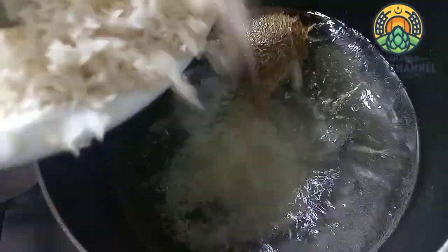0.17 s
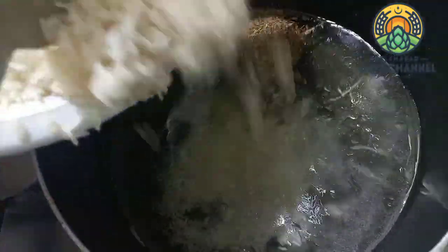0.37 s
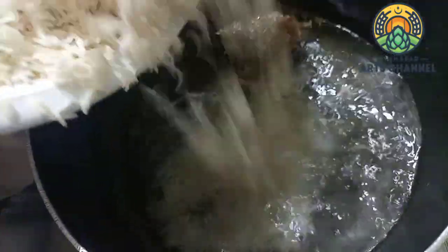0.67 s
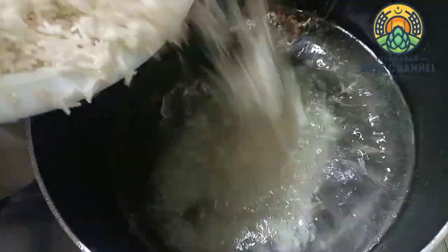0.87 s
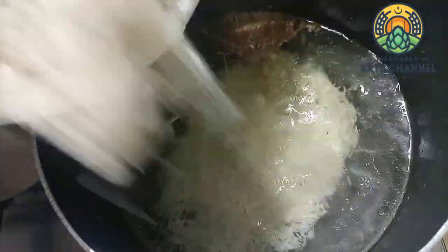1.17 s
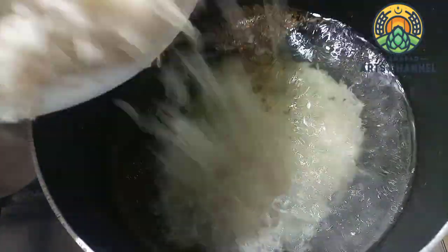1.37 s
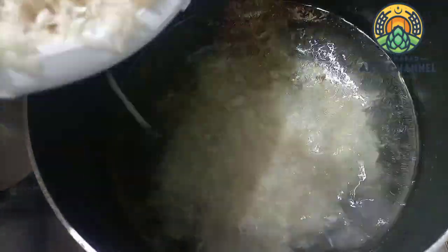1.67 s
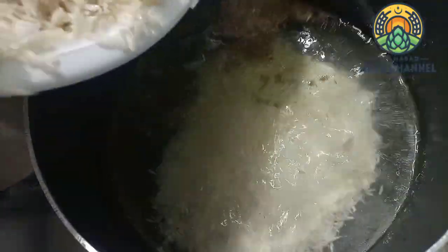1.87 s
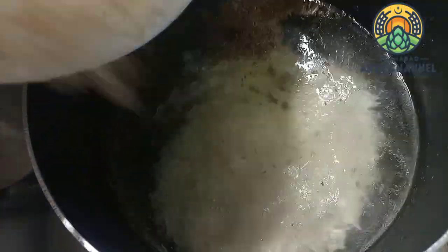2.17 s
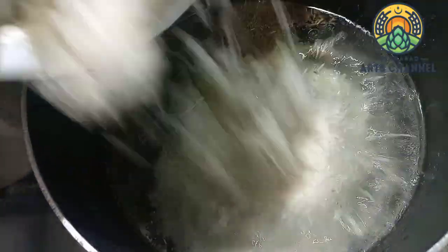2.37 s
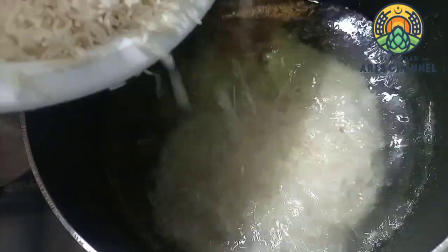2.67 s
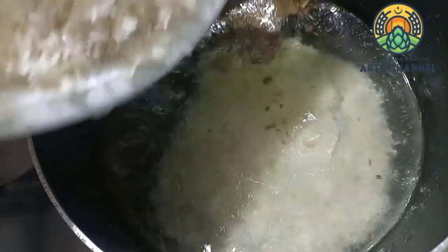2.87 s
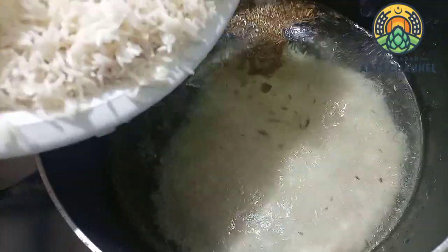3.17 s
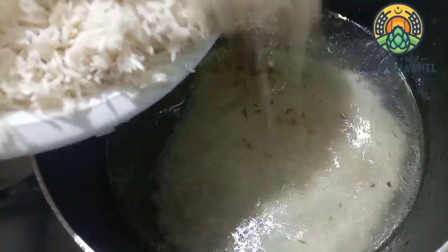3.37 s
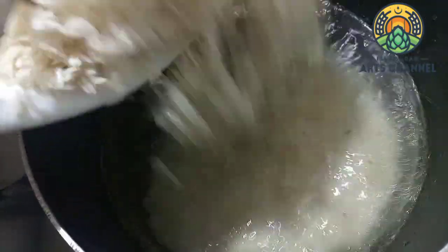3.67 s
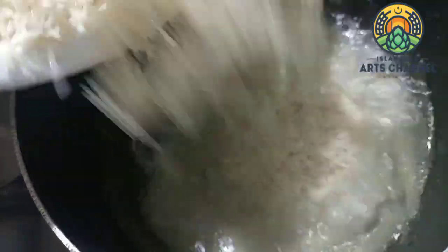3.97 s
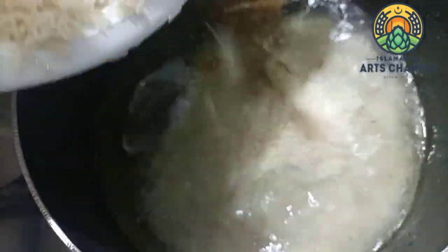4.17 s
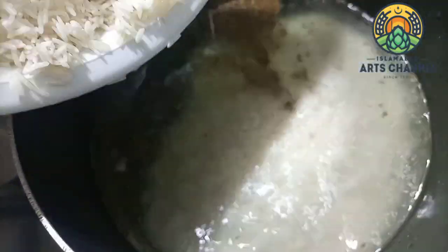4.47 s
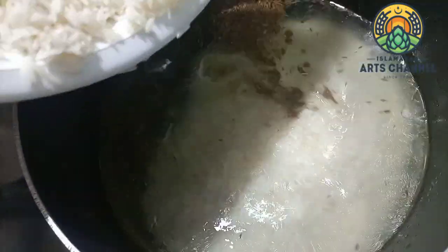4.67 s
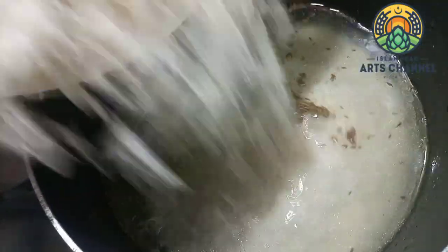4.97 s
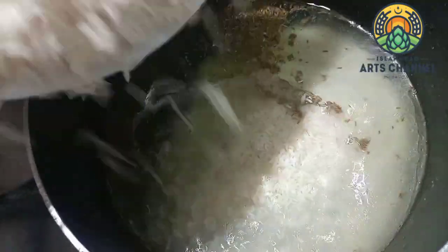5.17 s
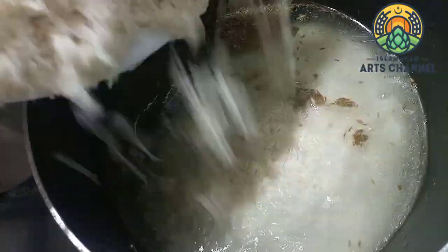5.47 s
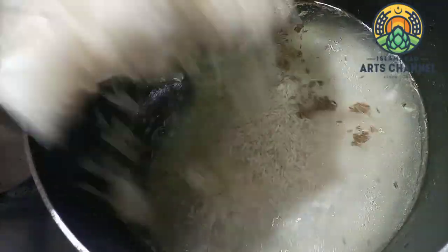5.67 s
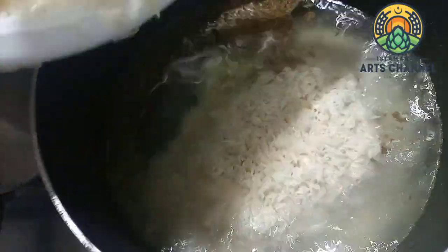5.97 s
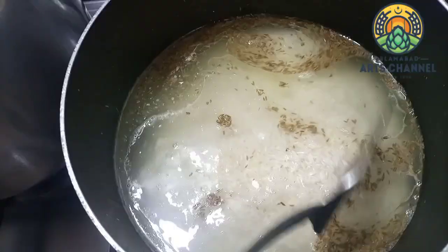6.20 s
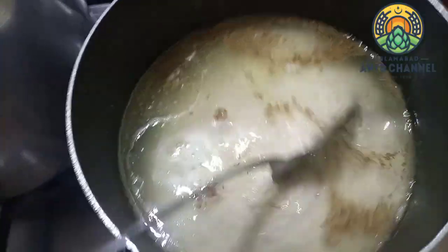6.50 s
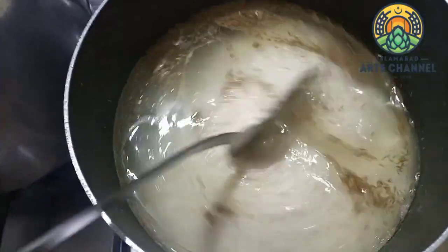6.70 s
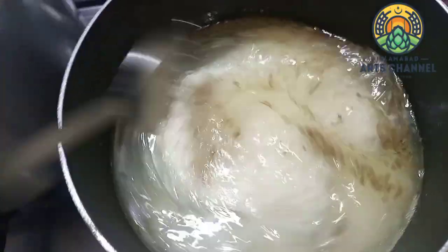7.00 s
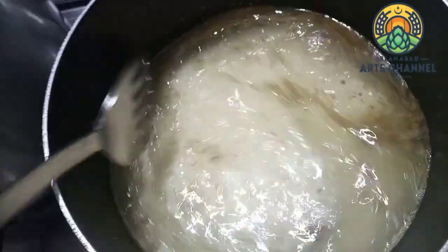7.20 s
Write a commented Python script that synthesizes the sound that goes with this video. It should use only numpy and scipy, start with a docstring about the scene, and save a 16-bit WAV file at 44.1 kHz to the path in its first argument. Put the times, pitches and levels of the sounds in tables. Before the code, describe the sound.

Wet rice is shaken from a bowl into a pot of water in pattering, bubbling bursts, bowl knocks between, then a spoon stirs and clinks.

```python
"""Soaked rice is shaken from a bowl into a pot of water in short pours that swell, hold and trail off,
close to a phone microphone in a small kitchen. Random impacts tick on the surface and tiny chirping
bubbles ring the air in the pot; the bowl, as damped modes and noise, is knocked between pours.
Then the water hisses softly as filtered impacts while a metal spoon scrapes through the rice and
clinks against the wall, as short ringing modes."""
import sys
import numpy as np
from scipy import signal
from scipy.fft import rfft, irfft, next_fast_len
from scipy.io import wavfile
from scipy.ndimage import uniform_filter1d

SR = 44100
rng = np.random.default_rng(int(sys.argv[2]) if len(sys.argv) > 2 else 0)


def wav_record(signal):
    """Record a signal, one row per channel, as 16-bit PCM in the file named by sys.argv[1]."""
    frames = np.transpose(np.atleast_2d(signal))
    bounded = np.clip(frames, -1, 1)
    # unit amplitude maps onto the largest positive 16-bit level
    quanta = np.round(bounded * 32767).astype(np.int16)
    wavfile.write(sys.argv[1], SR, quanta)


N = 323694
T = np.arange(N) / SR

# Event levels are set at the source, before any echo of pot and kitchen.
# pours of rice: [t/s, swell/s, hold/s, t60/s, patter level/dB, bubbles re patter/dB, tilt/(dB/octave)]
POURS = [(0.447, 0.013, 0.044, 0.11, -53, -30, 0), (0.554, 0.024, 0.15, .12, -54, -11.5, 0),
         (0.801, 0.0089, 0.29, 0.3, -57, 2, 1), (1.222, 0.038, 0.055, 0.76, -61.5, 4.5, 3),
         (1.48, 0.021, 0.11, 0.1, -58, -1, 7.5), (2.244, 0.037, 0.11, 0.15, -41, -3, 0),
         (2.466, 0.064, 0.046, 0.2, -39, -5, -2), (3.368, 0.062, 0.026, 0.32, -44, -19, -3.5),
         (3.528, 0.045, 0.065, 0.18, -51.5, -12, 2), (3.68, 0.022, 0.21, 0.085, -53.5, 0, 4),
         (3.965, 0.026, 0.067, 0.13, -47, -6.5, 1), (4.95, 0.019, 0.024, 0.29, -50, -5, 5.5),
         (5.347, 0.0077, 0.023, 0.37, -54.5, -6.5, 9), (5.617, 0.0044, 0.058, 0.15, -64, -7, 5),
         (5.723, 0.006, 0.1, 0.12, -50.5, -9.5, 0.5), (5.837, 0.0054, 0.025, 0.1, -37.5, -12.5, -5.5)]
# wet clumps that hit the water: [t/s, level/dB, tilt/(dB/octave)]
CLUMPS = [(0.07, -40, -3), (0.167, -46, 1), (0.256, -47.5, 1), (0.318, -53.5, 8.5), (0.366, -49.5, 6.5),
          (0.462, -38.5, -4), (.509, -50, 4), (0.686, -40.5, -12), (0.742, -42.5, 1), (0.769, -42, -9),
          (0.864, -43, 5.5), (.929, -48.5, 14), (1.038, -40, -7), (1.26, -40.5, 3), (1.29, -48, -3),
          (1.373, -52, -2), (1.4975, -35, 4.5), (1.504, -38, 5), (1.568, -38, -3.5), (2.24, -38, 5),
          (2.329, -34, 2.5), (2.36, -41, 20), (2.471, -39.5, -2), (2.55, -34.5, -1), (2.584, -39, 11),
          (3.247, -58, -2), (3.372, -37.5, 4.5), (3.42, -35.5, 5), (3.4615, -33.5, 7), (3.758, -41.5, 5.5),
          (3.8038, -40, 4), (3.859, -34, 2), (3.989, -31, 4), (4.038, -38.5, 3), (4.103, -39.5, -5),
          (5.132, -44.5, 2), (5.25, -55, 9), (5.374, -40, -6), (5.461, -50, 4)]
# single large bubbles: [t/s, peak level/dB, f/Hz at the start]
BUBBLES = [(0.033, -46.5, 2270), (0.073, -34, 2474), (0.16, -43.5, 2340), (0.249, -45, 1820),
           (0.483, -49, 1816), (.507, -44, 3620), (.598, -41.5, 1817), (0.647, -44.5, 1780),
           (.685, -39, 2460), (0.71, -33.5, 2505), (0.77, -39, 2240), (0.815, -33.5, 2470),
           (0.841, -37, 1910), (.873, -41, 1860), (0.951, -37, 2310), (.986, -39, 2580), (1.028, -41, 3000),
           (1.054, -41, 3830), (1.097, -26, 1895), (1.321, -45, 2600), (1.37, -42, 1823),
           (1.445, -43.5, 1790), (1.508, -42.5, 1860), (2.257, -30, 4880), (2.263, -37, 2950),
           (2.274, -29, 1830), (2.305, -35, 3470), (2.331, -31.5, 2220), (2.346, -32, 1810),
           (2.361, -24, 1846), (2.389, -38, 3700), (2.403, -37, 1880), (2.418, -35.5, 3710),
           (2.466, -35.5, 1760), (2.473, -40.5, 3660), (2.499, -37, 3330), (2.553, -24, 1805),
           (2.584, -33, 3660), (3.252, -49, 2004), (3.381, -38, 1910), (3.404, -31.5, 3260),
           (3.426, -27.5, 2435), (3.469, -30.5, 2440), (3.612, -36, 1830), (3.759, -30, 4640),
           (3.759, -38, 1800), (3.995, -28.5, 1863), (4.019, -39, 3790), (4.099, -44, 2310),
           (4.963, -33.5, 4480), (5.107, -35.5, 2567), (5.244, -36, 2470), (5.371, -40.5, 2620),
           (5.398, -44, 3600), (5.482, -35.5, 2540), (5.834, -37, 1560), (5.91, -30.5, 2264),
           (5.962, -46, 2630)]
# single grains that strike the wall of the pot: [t/s, peak level/dB after the treble cut, centre f/Hz]
STRIKES = [(0.0718, -37.5, 2580), (0.1934, -46.5, 4170), (0.3214, -37, 3660), (.429, -42, 4640),
           (0.531, -36, 3850), (0.5815, -50, 2370), (0.616, -38.5, 2400), (0.7, -36, 3600),
           (0.8167, -28.5, 2700), (0.955, -37, 2430), (0.988, -47, 2580), (1.0308, -41, 3020),
           (1.043, -34, 3340), (1.2388, -46, 1100), (1.272, -31, 2950), (2.2586, -34, 2980),
           (2.333, -27.5, 2400), (2.364, -29, 2980), (2.4611, -34, 5260), (2.5902, -29.5, 3730),
           (3.245, -37, 3640), (3.267, -46, 3600), (3.462, -26, 4240), (3.597, -33, 5230),
           (3.7598, -32, 1960), (3.866, -33, 2660), (4.3597, -46, 4470), (5.603, -49, 2470),
           (5.7155, -41, 2550), (5.8357, -31, 1650), (5.8495, -27, 2330), (5.865, -25, 2600),
           (5.8998, -32.5, 2570)]
# dull bumps and heavy plops: [t/s, peak level/dB, f/Hz, length/s (half the t60)]
THUDS = [(1.236, -47.5, 450, 0.05), (1.536, -56, 242, 0.042), (1.968, -56, 138, 0.053),
         (1.975, -47.5, 473, 0.035), (2.263, -56, 420, 0.049), (3.61, -56.5, 420, 0.04),
         (3.648, -57, 128, 0.024), (3.844, -58.5, 130, 0.087), (4.369, -52.5, 167, 0.079),
         (4.439, -60, 71, 0.078), (4.788, -55.5, 267, 0.05), (5.603, -57.5, 110, .03),
         (5.644, -51, 332, .03), (5.663, -43, 255, 0.0079), (5.719, -56.5, 80, 0.069),
         (5.781, -55, 200, 0.054), (5.842, -33.5, 504, 0.0092), (5.896, -44, 610, 0.011),
         (5.898, -47.5, 169, 0.018), (5.928, -45, 139, 0.041), (6.08, -41, 597, 0.0051),
         (6.093, -38, 394, 0.0068), (6.129, -62, 100, 0.047), (6.36, -62.5, 105, 0.044),
         (7.113, -37.5, 330, .013), (7.135, -43, 395, 0.055), (7.225, -53, 121, 0.09),
         (7.289, -37, 620, 0.064), (7.321, -45.5, 288, 0.035)]
# gurgles of trapped air: [t/s, length/s, peak level/dB, centre f/Hz]
GURGLES = [(1.239, .04, -61, 900), (1.504, 0.0093, -49, 1114), (2.487, .035, -52, 1190),
           (2.538, 0.063, -44, 1300), (3.621, .025, -52.5, 1000), (5.02, .008, -43.5, 1680),
           (5.035, 0.0074, -55, 1030)]
# knocks on the rice bowl: [t/s, peak level/dB, hollow note f/Hz, tuning ratio of the wall modes,
# hollow note level/dB, middle level/dB, treble level/dB, rim note f/Hz, rim note level/dB]
KNOCKS = [(1.777, -23.5, 860, 1.164, -10.5, -4.5, 1.5, 2763, 8),
          (1.963, -14.5, 730, 1.06, -0.5, 0, 8, 2370, 4.5),
          (2.021, -26, 730, 0.92, -25, -0.5, 16.5, 3920, -10.5),
          (2.961, -31.5, 854, 0.82, 22, 2, -1, 2680, 1), (2.967, -15.5, 726, 0.87, 17, 5, 9.5, 2680, 7),
          (3.131, -25, 800, 0.93, 9, 1.5, 4, 3876, 7), (4.334, -14.5, 547, 1.04, 2, -1, -8.5, 2180, 1),
          (4.386, -39, 515, 1.03, 7, 2, -6, 3380, 0), (4.788, -40, 1055, 1.25, 10, -4, -6.5, 3070, 6),
          (5.911, -24, 444, 1.1, -22, -5.5, 9, 3620, -2.5)]
# rice sliding in the bowl: [t/s, hold/s, level/dB]
SLIDES = [(2.117, 0.011, -62.5), (3.223, 0.026, -67), (4.495, 0.042, -57)]
# wet grains squeaking against the bowl: [t/s, peak level/dB, length/s (half the t60), f/Hz]
SQUEAKS = [(2.135, -51, 0.056, 2600), (3.24, -46, 0.018, 4130), (4.4, -53.5, 0.085, 3130),
           (4, -48, .045, 1520), (4.51, -48.5, 0.053, 3400), (4.535, -49, 0.12, 2950),
           (4.515, -61, .04, 5200), (4.545, -54, 0.082, 4670), (4.54, -68, 0.049, 6300)]
# low booms of the nudged pot: [t/s, peak level/dB, f/Hz, t60/s]
BOOMS = [(5.657, -43, 87.5, .09), (5.668, -39.5, 150, 0.026), (5.847, -35, 175, 0.021),
         (5.85, -51, 70, .06), (5.943, -46.5, 62, 0.09), (6.012, -52, 65, .08), (7.149, -39.5, 106.3, 0.2)]
# spoon sliding through the rice: [t/s, peak level/dB, length/s (half the t60), f/Hz]
SCRAPES = [(6.06, -61, 0.065, 5980), (6.08, -47, 0.053, 3190), (6.085, -55, 0.089, 4380),
           (6.115, -68, .05, 6750), (6.135, -62, .04, 5510), (6.19, -57, 0.08, 4100),
           (6.21, -64, .04, 4800), (6.298, -58, 0.042, 6370), (6.299, -52.5, .04, 4110),
           (6.3, -62, 0.026, 5160), (6.345, -58.5, 0.084, 4480), (6.385, -67, 0.08, 5800),
           (6.42, -71, 0.065, 6750), (6.435, -54.5, 0.079, 4370), (6.47, -62.5, .05, 5020)]
# spoon striking the pot: [t/s, peak level/dB, lower note f/Hz, upper note f/Hz, treble level/dB, body level/dB]
CLINKS = [(7.115, -9.5, 2020, 2610, -13.5, -11.5), (7.1524, -13, 2505, 2785, -15.5, -10.5),
          (7.248, -22, 2790, 2970, -6, -9.5), (7.2918, -13, 1840, 2356, -8.5, -6)]

# air resonances above the water: [f/Hz, level/dB, t60/s]
CAVITY = [(1835, -11.5, 0.075), (2466, -12, 0.068), (3054, 0, 0.012), (3730, -10.5, 0.04),
          (4310, -5.5, 0.028), (5400, -11.5, 0.062)]
# hollow notes of the bowl, which shift with grip and load: [ratio to the note, level/dB, t60/s]
BOWL_HOLLOW = [(0.922, -8.5, 0.046), (1.026, 1.5, 0.027), (1.244, -5, 0.03), (1.0, -11, 0.15)]
# modes of the bowl's wall, before tuning: [f/Hz, level/dB, t60/s]
BOWL_WALL = [(1454, 3, 0.047), (1587, -6.5, 0.055), (2070, -5.5, 0.052), (2598, -2.5, 0.029),
             (2848, -6, 0.017), (3760, -9.5, 0.018), (4013, -18.5, 0.012)]
# modes of spoon and pot: [f/Hz, level/dB, t60/s]
POT = [(704, -9, .15), (855, 7.5, .12), (1054, 12.5, 0.18), (1340, -14, .22), (1575, 5.5, 0.23),
       (1820, -4, .17), (2000, 16.5, .19), (2350, -3, .17), (2540, 5, 0.24), (2760, 3, .14),
       (3300, -12, .06), (4170, -11.5, .05), (6350, -12, .035)]

# filter curves of room noise, patter, knock, sliding rice, hiss and clink: [f/Hz, level/dB]
ROOM_COLOUR = [(18, -61.5), (30, -23), (124, -3.5), (227, -9.5), (303, -1), (404, -9), (1390, -9),
               (1540, -7), (1670, -4.5), (3060, -14.5), (3980, -22), (4300, -24.5), (5900, -25.5),
               (6380, -37.5), (16000, -50.5)]
PATTER_COLOUR = [(530, -44), (900, -31), (1080, -44.5), (1600, -25.5), (1730, -31), (1830, -4), (2120, -12),
                 (2420, -4.5), (2730, -14), (3730, -5.5), (4740, -6), (6000, -12), (7310, -22.5),
                 (8700, -28), (10600, -35.5), (13000, -45.5), (16000, -32.5)]
KNOCK_COLOUR = [(150, -36), (450, -1.5), (750, 4), (1150, 5.5), (1600, 9.5), (2700, 0), (4000, -1.5),
                (6000, -22.5), (9000, -51), (15000, -116.5)]
SLIDE_COLOUR = [(400, -22), (730, 2.5), (1250, -10), (1490, 2), (2200, -4), (3100, 6.5), (3900, -3),
                (4500, -7.5), (5100, -6), (5900, -18), (7000, -40), (12000, -50)]
HISS_COLOUR = [(180, -14.5), (300, -6), (328, -19), (402, -10.5), (1030, -7), (1250, -8.5), (1530, 6),
               (1850, 5.5), (2400, 11.5), (2750, 8), (3200, -5.5), (3910, -18), (4270, -16), (6530, -48),
               (10000, -76), (13000, -91.5), (22000, -120)]
CLINK_COLOUR = [(30, -60), (170, -13), (400, -1), (1050, 1), (1320, -12.5), (1750, 1.5), (2700, 10),
                (3700, -1), (4300, 4), (5200, -10), (6300, -4), (8500, -37), (15000, -90)]

# bands of the patter that flare separately from lump to lump
PATTER_BANDS_HZ = np.geomspace(1700, 13600, 10)
MOTTLE_DB = 3.1

ROOM_DB, RUMBLE_HZ, RUMBLE_DB, RUMBLE_WAVER_DB = -66.5, 108, -87, 4.5
TRICKLE_DB, TRICKLE_S = -66, 0.15  # stray grains keep falling around each pour
HEAVY_DB = -38  # flow at which the patter is fully dense
LOW_BUBBLE_DB = -27  # heavy flow also traps larger, lower bubbles
CLUMP_ATTACK_S, CLUMP_T60_S = 0.003, 0.084
# t60 at the reference pitch, how much sooner higher bubbles die (exponent), rise in octaves per t60
BUBBLE_REF_HZ, BUBBLE_T60_S, BUBBLE_DAMPING, BUBBLE_RISE = 2000, 0.018, 0.98, 0.057
# one drop of water chirps steeply upwards; rise in octaves per t60
DRIP_S, DRIP_DB, DRIP_HZ, DRIP_T60_S, DRIP_RISE = 5.2, -30.5, 1450, .031, 1.9
THUD_OCTAVES = 0.89  # scales the width of their band
GURGLE_OCTAVES, GURGLE_T60_S = 0.53, 0.015  # spread of pitch and t60 of their bubbles
THIN_START_S, THIN_SWELL_S, THIN_HZ, THIN_DB = 1.85, .108, 1020, -54.5
SLIDE_SWELL_S, SLIDE_T60_S = 0.036, 0.38
STIR_S, STIR_DB, STIR_FADE_DB_PER_S = 6.02, -55, 2  # the water hisses from the first stroke on
SURGE_S, SURGE_DB, SURGE_T60_S = 6.301, -45.5, 0.95  # and surges when the spoon digs in
CLANK_T60_S = .045
CLANK_DB, POT_DB = -6.5, -17  # peaks of the spoon's two notes and of the pot, re the contact noise
TOP_HZ = 15850


def undb(db):
    """Decibels to gain."""
    return 10 ** (np.asarray(db) / 20)


def unit(x):
    """Scale to rms 1."""
    return x / np.sqrt(np.mean(x ** 2))


def peak(x, db):
    """Scale to a peak level."""
    return x * undb(db) / np.abs(x).max()


def fade(t, t60):
    """Exponential decay by 60 dB in t60 seconds."""
    return np.exp(-np.log(1000) * t / max(t60, 1e-4))


def envelope(start, swell, hold, t60):
    """Linear swell, hold and exponential release."""
    t = T - start
    return np.clip(t / max(swell, 1e-4), 0, 1) * fade(np.maximum(t - swell - hold, 0), t60)


def add(out, s, x):
    """Mix x into out at time s."""
    i = int(np.clip(s * SR, 0, N - 1))
    out[i:i + len(x)] += x[:N - i]


def colour(x, points):
    """Causal, minimum-phase filter through (Hz, dB) points, built from the cepstrum."""
    size = next_fast_len(len(x) // 2 + 2048) * 2
    hz, db = np.transpose(points)
    log_hz = np.log(np.fft.rfftfreq(size, 1 / SR) + 1)
    gain = undb(np.interp(log_hz, np.log(hz), db))
    cepstrum = irfft(np.log(gain))
    # folding the cepstrum forward in time makes the filter causal
    cepstrum[1:size // 2] *= 2
    cepstrum[size // 2 + 1:] = 0
    return irfft(rfft(x, size) * np.exp(rfft(cepstrum)))[:len(x)]


def ring(modes):
    """Impulse response of (Hz, dB, t60) modes: a sum of decaying sines."""
    t = T[:SR // 4]
    return sum(undb(db) * fade(t, t60) * np.sin(2 * np.pi * hz * t) for hz, db, t60 in modes)


def bubble(hz, t60, rise, swell=0.13, bend=0.74):
    """A trapped bubble rings, rising in pitch as it nears the surface."""
    t = T[:int(t60 * SR) + 2]
    pitch = hz * 2 ** np.minimum(rise * (t / t60) ** bend, 2)
    onset = (1 - np.exp(-t / (swell * t60))) ** 2
    return fade(t, t60) * onset * np.sin(2 * np.pi * np.cumsum(pitch) / SR)


def ticks(per_s, scatter_db):
    """Random impacts of either sign and uneven size."""
    hit = rng.random(N) < per_s / SR
    size = undb(scatter_db * np.minimum(rng.exponential(size=N), 4))
    return hit * rng.choice([-1, 1], N) * size


def fizz(low_hz, high_hz, cycles, scatter_db, count):
    """A stream of bubbles of all sizes, each ringing for about the given number of cycles."""
    out = np.zeros(N)
    for when, size, loud, life in rng.random((count, 4)):
        hz = low_hz * (high_hz / low_hz) ** size
        gain = undb(-scatter_db * np.log(loud + .02))
        add(out, when * T[-1], gain * bubble(hz, cycles * (.5 + life) / hz, .08))
    return out


def lumpy(rate, depth_db, t=T):
    """Uneven level, drifting between random knots, as when wet grains stick together in quick lumps."""
    knots = np.cumsum(rng.exponential(1 / rate, 4000))
    heights = np.clip(rng.standard_normal(4000), -2, 2)
    return unit(undb(depth_db * np.interp(t, knots, heights)))


def steady(x, span_s):
    """Even out a random stream over a span, leaving its fine grain."""
    local_power = np.abs(uniform_filter1d(x ** 2, int(span_s * SR)))
    return x / np.sqrt(local_power + 0.056 * np.mean(x ** 2))


def mottle(x, tilt):
    """Lumps of grains land with their own colour: bands flare separately, around a tilt in dB per octave."""
    size = next_fast_len(N)
    spectrum, out = rfft(x, size), 0
    log_hz = np.log(np.fft.rfftfreq(size, 1 / SR) + 1)
    for hz, own in zip(PATTER_BANDS_HZ, np.eye(len(PATTER_BANDS_HZ))):
        band = irfft(spectrum * np.interp(log_hz, np.log(PATTER_BANDS_HZ), own), size)[:N]
        octaves = min(np.log2(hz / 3500), 1.5)
        out = out + band * lumpy(rate=190, depth_db=MOTTLE_DB) * undb(tilt * octaves)
    return out


def in_pot(x, ring_db, dense_db):
    """Sound from the surface, the main air resonances of the pot and its many weaker ones."""
    weak = [(1600 + 70 * (k + place), 8 * loud, .035)
            for k, (place, loud) in enumerate(rng.random((95, 2)))]
    signs = rng.choice([-1, 1], len(weak))
    walls = sum(sign * ring([mode]) for sign, mode in zip(signs, weak))
    rung = unit(signal.fftconvolve(x, ring(CAVITY))[:N])
    dense = unit(signal.fftconvolve(x, walls)[:N])
    return unit(unit(x) + undb(ring_db) * rung + undb(dense_db) * dense)


def crack(t60, tail_db, tail_t60):
    """Contact noise with a weaker, longer rattling tail."""
    t = T[:SR // 4]
    return rng.standard_normal(len(t)) * (fade(t, t60) + undb(tail_db) * fade(t, tail_t60))


def damped(x, left):
    """The ring holds for a moment, then drops to a share of its strength."""
    return x * np.interp(T[:len(x)], [.011, .016], [1, left])


def rubs(table, ring_t60, rasp_db):
    """Uneven friction swells and dies; each contact sings at its own pitch over a dry rasp."""
    out, t = np.zeros(N), T[:SR // 2]
    for s, db, length, hz in table:
        swell = t * fade(t, 2 * length)
        rub = lumpy(rate=100, depth_db=2.5, t=t) * rng.standard_normal(len(t)) * swell
        sung = unit(signal.fftconvolve(rub, ring([(hz, 0, ring_t60)]))[:len(t)])
        band = [(hz / 3, -25), (hz * 0.58, 0), (hz * 1.05, 0), (hz * 2.0, -28)]
        add(out, s, peak(colour(sung + undb(rasp_db) * unit(rub), band), db))
    return out


def background():
    """Steady room noise with a faint, wavering rumble, both filtered noise."""
    band = [(RUMBLE_HZ / 4, -20), (RUMBLE_HZ, 0), (RUMBLE_HZ * 2, -10), (RUMBLE_HZ * 10, -50)]
    rumble = unit(colour(rng.standard_normal(N), band))
    rumble = lumpy(rate=19.0, depth_db=RUMBLE_WAVER_DB) * rumble
    room = unit(colour(rng.standard_normal(N), ROOM_COLOUR))
    return undb(ROOM_DB) * room + undb(RUMBLE_DB) * rumble


def rice():
    """Grains tick and trap bubbles; the heavier the flow, the denser and more even the patter."""
    power, deep, bright = np.zeros((3, N))
    for s, swell, hold, t60, db, bubble_db, tilt_db in POURS:
        gain = undb(db) * envelope(s, swell, hold, t60)
        power += gain ** 2
        bright += tilt_db * gain ** 2
        deep += gain * undb(bubble_db)
    t = T[:SR // 4]
    for s, db, tilt_db in CLUMPS:
        gain = undb(db) * fade(t, CLUMP_T60_S) * (1 - np.exp(-t / CLUMP_ATTACK_S))
        add(power, s, gain ** 2)
        add(bright, s, tilt_db * gain ** 2)
    falling = np.sqrt(power)
    tilt = bright / (power + undb(TRICKLE_DB) ** 2)  # the stronger flow decides the tilt
    trickle = uniform_filter1d(np.minimum(falling, undb(TRICKLE_DB)), int(TRICKLE_S * SR))
    weight = falling + trickle
    heavy = np.clip(weight / undb(HEAVY_DB), 0, 1)

    impacts = unit(ticks(3000 + 4000 * heavy, scatter_db=3.5))
    spray = unit(fizz(2400, 9500, cycles=21, scatter_db=4.0, count=4600))
    patter = in_pot(impacts + undb(-3.5) * spray, ring_db=-8.0, dense_db=-1.5)
    patter = mottle(steady(colour(patter, PATTER_COLOUR), 0.037), tilt)

    bubbles = in_pot(fizz(1700, 3000, cycles=18, scatter_db=4.4, count=2600), ring_db=11.0, dense_db=7.5)
    bubbles = colour(bubbles, [(1200, -10.0), (1750, -2.5), (3200, -3), (6000, -24.0), (10000, -37.0)])
    low = unit(fizz(1100, 1640, cycles=69, scatter_db=7.0, count=500))
    low = undb(LOW_BUBBLE_DB) * heavy * low

    lumps = lumpy(rate=130, depth_db=2.6) ** (1 - .7 * heavy)
    return lumps * (weight * patter + deep * (steady(bubbles, 0.065) + low))


def plops():
    """Large bubbles and one drip ring out over the patter and echo off the wall of the pot."""
    out = np.zeros(N)
    for s, db, hz in BUBBLES:
        t60 = BUBBLE_T60_S * (BUBBLE_REF_HZ / hz) ** BUBBLE_DAMPING
        add(out, s, peak(bubble(hz, t60, BUBBLE_RISE, swell=0.22), db))
    drip = bubble(DRIP_HZ, DRIP_T60_S, DRIP_RISE, swell=0.26, bend=1.3)
    add(out, DRIP_S, peak(drip, DRIP_DB))
    out = colour(out, [(3000, -1.5), (5000, -5), (8000, -13)])
    out = out + .45 * np.roll(out, int(.0014 * SR))  # the echo, 1.4 ms late
    return np.std(out) * in_pot(out, ring_db=-3.5, dense_db=-4.5)


def strikes():
    """A stray grain gives one dry tick: contact noise in a band coloured by the pot."""
    out = np.zeros(N)
    for s, db, hz in STRIKES:
        band = [(hz / 5, -35), (hz / 1.0, -9), (hz, 0), (hz * 1.28, -8), (hz * 3, -32), (hz * 6, -50)]
        tick = colour(crack(0.0054, -12.0, 0.08), band)
        add(out, s, peak(colour(tick, [(6000, -2.5), (11000, -18.5)]), db))
    return out


def thuds():
    """Soft, heavy contacts: noise that swells and dies in one low band."""
    out, t, width = np.zeros(N), T[:SR // 2], THUD_OCTAVES
    for s, db, hz, length in THUDS:
        push = rng.standard_normal(len(t)) * t * fade(t, 2 * length)
        below = [(hz / 24 ** width, -55), (hz / 8 ** width, -37), (hz / 2 ** width, -5)]
        above = [(hz * 2 ** width, -7), (hz * 8 ** width, -38), (hz * 64 ** width, -75)]
        add(out, s, peak(colour(push, below + [(hz, 0)] + above), db))
    return out


def gurgles():
    """A collapsing pocket of air breaks into a quick cluster of seven low bubbles."""
    out = np.zeros(N)
    for s, length, db, hz in GURGLES:
        cluster = np.zeros(N)
        for k, (when, size, loud) in enumerate(rng.random((7, 3))):
            pitch = hz * 2 ** (GURGLE_OCTAVES * (size - .5))
            pop = (.5 + loud) * bubble(pitch, GURGLE_T60_S, BUBBLE_RISE)
            add(cluster, length * (k + when) / 7, pop)
        add(out, s, peak(cluster[:SR // 4], db))
    return out


def knocks():
    """The bowl is knocked to loosen the rice: a hollow note, quickly damped by the hand."""
    out, t = np.zeros(N), T[:SR // 4]
    contact = np.minimum(t / .0015, 1)
    body = [(60, -4.5), (350, -13.5), (520, -5.0), (900, 0.5), (1150, -14), (1400, -4.5),
            (6000, 1.5), (10000, 5.5)]
    for s, db, note_hz, tuning, hollow_db, middle_db, treble_db, rim_hz, rim_db in KNOCKS:
        hollow = ring([(note_hz * ratio, mode_db + hollow_db, t60) for ratio, mode_db, t60 in BOWL_HOLLOW])
        wall_modes = [(hz * tuning, mode_db, t60) for hz, mode_db, t60 in BOWL_WALL]
        wall = ring(wall_modes + [(rim_hz, rim_db, .025)])
        hardness = [(900, 0.0058), (1500, middle_db), (2400, 0.0066), (3700, treble_db)]
        modes = colour(hollow + wall, hardness)
        rattle = colour(colour(crack(0.0052, -23, 0.15), KNOCK_COLOUR), hardness)
        hit = damped(contact * (unit(modes) + undb(-2) * unit(rattle)), .5)
        add(out, s, peak(colour(hit, body), db))
    return out


def thin_tone():
    """A faint, thin ring, one sine, swells just before one knock."""
    swell = envelope(THIN_START_S, THIN_SWELL_S, 0, .03)
    return undb(THIN_DB) * swell * np.sin(2 * np.pi * THIN_HZ * T)


def slides():
    """Wet rice rustles softly, as dense filtered impacts, when it shifts in the tilted bowl."""
    rustle = unit(colour(ticks(5000, scatter_db=7.5), SLIDE_COLOUR))
    return rustle * sum(undb(db) * envelope(s, SLIDE_SWELL_S, hold, SLIDE_T60_S) for s, hold, db in SLIDES)


def squeaks():
    """Wet grains squeak against the bowl: friction that sings more than it rasps."""
    return rubs(SQUEAKS, ring_t60=0.049, rasp_db=-7)


def booms():
    """The full pot rocks briefly on its stand: low decaying sines of fixed pitch."""
    out = np.zeros(N)
    for s, db, hz, t60 in BOOMS:
        add(out, s, peak(bubble(hz, t60, 0, swell=0.072), db))
    return out


def hiss():
    """The stirred water fizzes finely as dense impacts, flutters, surges once and slowly settles."""
    since = T - STIR_S
    gain = undb(STIR_DB - STIR_FADE_DB_PER_S * since) * np.clip(since / 0.0024, 0, 1)
    surge = undb(SURGE_DB) * envelope(SURGE_S, 0.0019, 0, SURGE_T60_S)
    water = unit(colour(ticks(7000, scatter_db=1.5), HISS_COLOUR))
    return np.hypot(gain, surge) * lumpy(rate=45, depth_db=1.1) * water


def scrapes():
    """The spoon slides through the rice and sings at a pitch that shifts from rub to rub."""
    return rubs(SCRAPES, ring_t60=0.03, rasp_db=3.5)


def spoon():
    """Metal strikes the pot wall: a sharp clank whose notes depend on the spot struck, then a faint ring."""
    out = np.zeros(N)
    for s, db, low_hz, high_hz, treble_db, body_db in CLINKS:
        clank = ring([(low_hz, 0, CLANK_T60_S), (high_hz, 2.5, CLANK_T60_S)])
        contact = crack(0.024, -16, 0.25)
        contact[0] += 7  # a click at first touch
        contact = colour(contact, CLINK_COLOUR)
        pot = ring(POT) * lumpy(rate=120, depth_db=1.5, t=T[:SR // 4])
        hit = damped(peak(clank, CLANK_DB) + peak(contact, 0), 0.82) + peak(pot, POT_DB)
        add(out, s, peak(colour(hit, [(800, body_db), (2300, 0.011), (4500, treble_db)]), db))
    return out


def kitchen(x, wet_db, t60):
    """Hard nearby walls add a short diffuse tail of decaying noise."""
    t = T[:SR // 2]
    tail = rng.standard_normal(len(t)) * fade(t, t60) * (1 - np.exp(-t / 0.0055))
    tail = colour(tail, [(200, 12.0), (1500, 9.0), (4000, -5.0), (9000, -24.5)])
    return x + undb(wet_db) * signal.fftconvolve(x, tail / np.linalg.norm(tail))[:N]


def scene():
    """Everything happens at the pot, inside the kitchen; the bowl is nearest to the phone."""
    water = kitchen(rice() + plops() + gurgles() + strikes(), wet_db=-19.5, t60=0.046)
    bowl = kitchen(knocks(), wet_db=-20, t60=0.19)
    pot = kitchen(spoon() + scrapes() + thuds(), wet_db=-14.5, t60=0.14)
    sliding = slides() + squeaks()  # no kitchen tail
    return (water + bowl + pot + booms() + sliding + thin_tone() + hiss() + background())[None]


def record(dry):
    """The phone's microphone thins the deepest bass and cuts the top."""
    bass_cut = signal.butter(3, 36, "high", fs=SR, output="sos")
    top_cut = signal.ellip(10, .2, 70, TOP_HZ, fs=SR, output="sos")
    return signal.sosfilt(top_cut, signal.sosfilt(bass_cut, dry))


dry = scene()
out = record(dry)
wav_record(out)
```